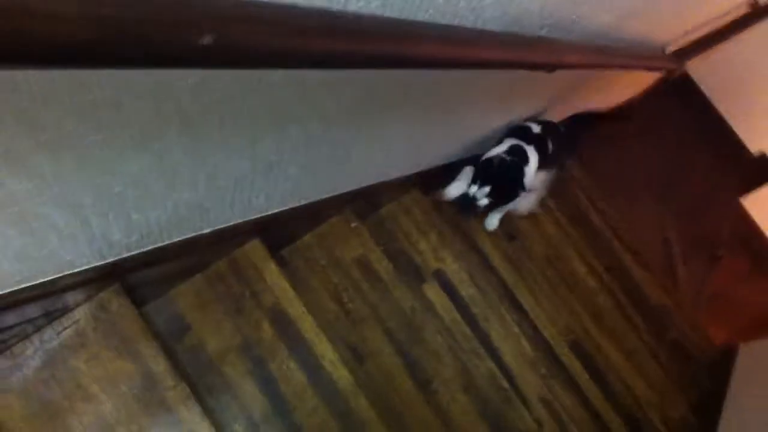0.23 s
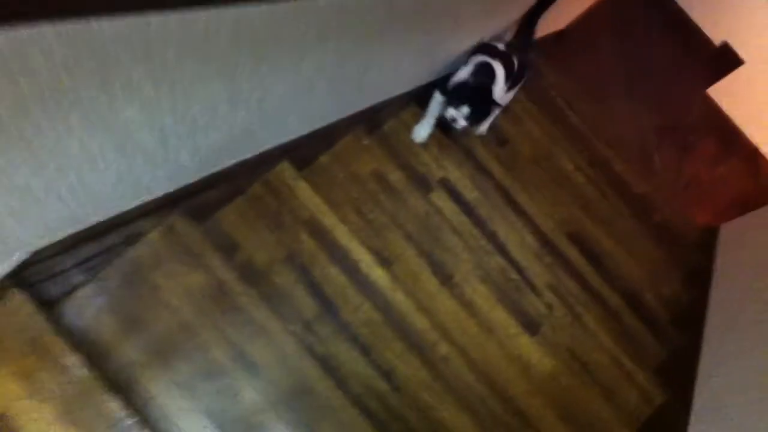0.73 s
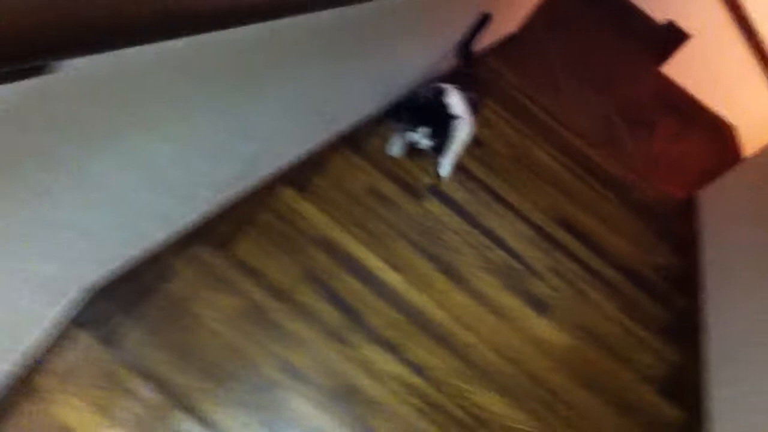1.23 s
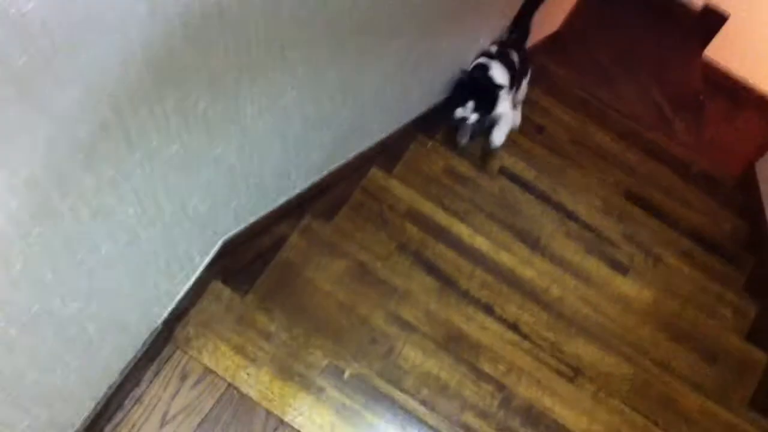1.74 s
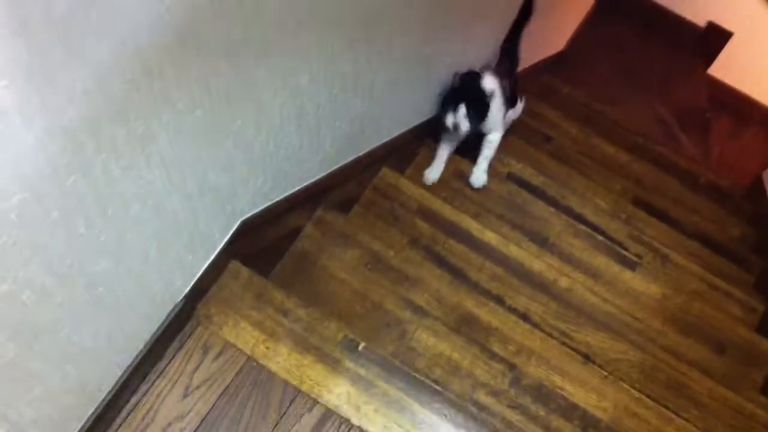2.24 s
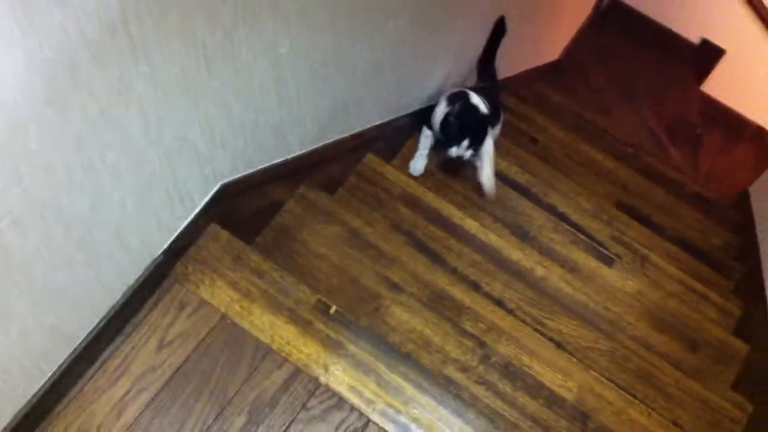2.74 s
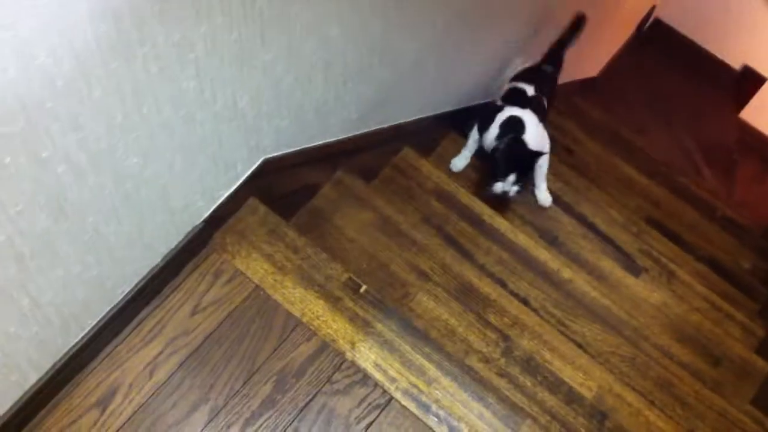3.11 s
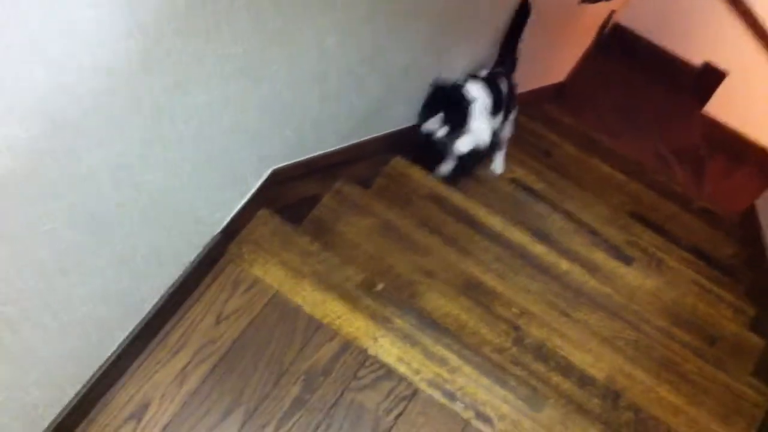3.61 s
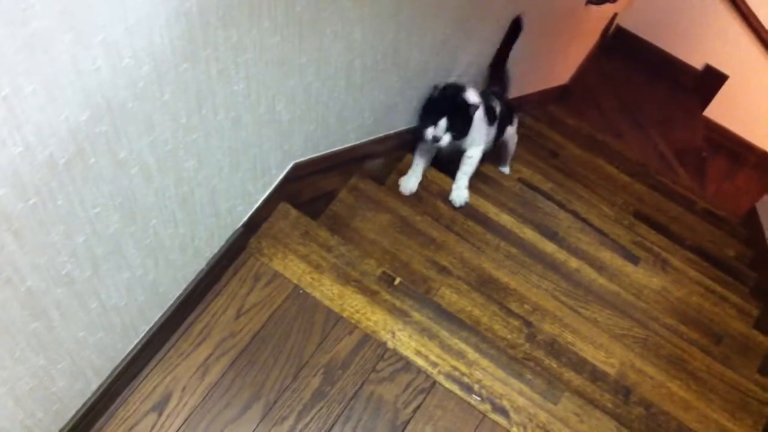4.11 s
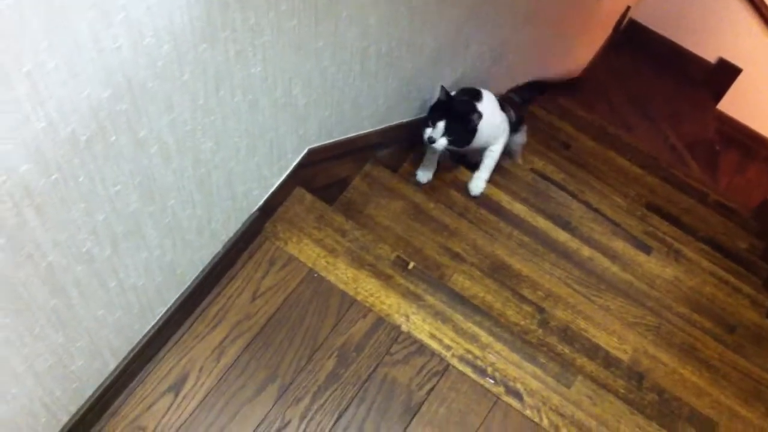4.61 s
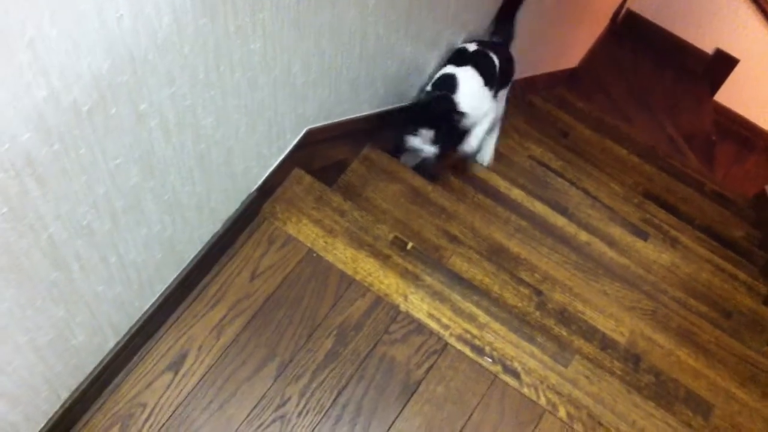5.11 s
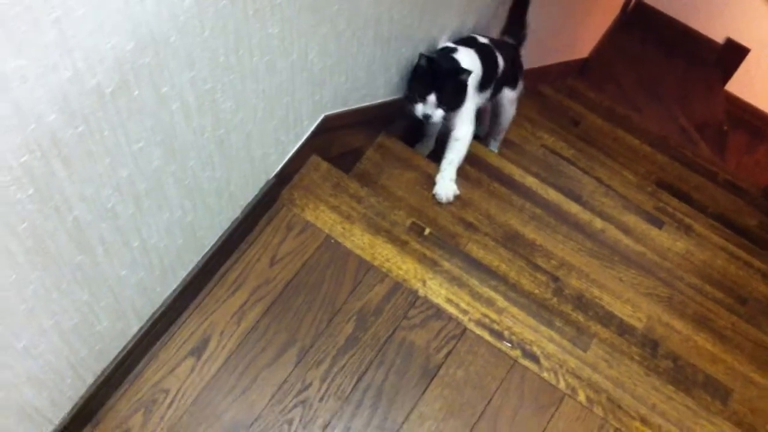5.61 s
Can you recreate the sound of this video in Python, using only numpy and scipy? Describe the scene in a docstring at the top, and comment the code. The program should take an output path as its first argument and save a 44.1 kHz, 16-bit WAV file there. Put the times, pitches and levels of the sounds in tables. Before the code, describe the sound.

Soft, irregular paw thumps and light claw taps sound on varnished wooden stairs as a cat makes its way up, heard from a nearby hand-held microphone. Brief dry rustles pass now and then. One sharp, much louder knock on the wood stands out around the middle, followed by more gentle steps and barely audible squeaks from a tread. The stairwell adds a short echo over a faint steady hiss.

```python
"""A quiet, echoing stairwell, with a hand-held mono microphone close to a cat on the wooden stairs.
Each paw thumps a tread into its low modes, with a knock, a tick and a scuff on top; one hard knock is
far louder. Claws tap the varnish, and late on a tread squeaks faintly under load. Cloth or fur brushes
past now and then, close and dry, over the steady hiss of house and microphone."""
import sys
import numpy as np
from scipy import signal
from scipy.fft import rfft, irfft
from scipy.io import wavfile
from scipy.ndimage import uniform_filter1d

SR = 44100
rng = np.random.default_rng(int(sys.argv[2]) if len(sys.argv) > 2 else 0)


def wrap_up_sound(samples):
    """Save the sound to the file named by the first command line argument, as 16-bit audio."""
    columns = np.atleast_2d(samples).T
    # keep every value between -1 and 1, then stretch to whole-number steps
    tamed = np.clip(columns, -1, 1)
    steps = np.round(tamed * 32767).astype(np.int16)
    wavfile.write(sys.argv[1], SR, steps)


N = 258412

# Spectrum of the house and microphone hiss: f/Hz, relative density/dB
HISS_SPECTRUM = [(15, -60), (25, -13), (49, -20), (165, 4), (458, -6.5), (568, -3), (667, -8), (1860, -11),
                 (2010, -13), (2560, -14.5), (3540, -15), (4760, -17.5), (15600, -20)]
# Strokes of cloth or fur: crest t/s, rise/s, hold/s, fall/s, bright level/dB, dull part re bright/dB
BRUSH_STROKES = [(0.142, 0.27, 0.014, 0.14, -67, 5), (0.21, 0.023, 0.01, 0.35, -68.5, 4),
                 (0.647, 0.32, 0.092, 0.068, -52.5, -9), (0.786, 0.078, 0.23, 0.12, -69, -1),
                 (1.148, 0.2, 0.18, 0.1, -60, -1.5), (1.389, 0.08, 0.13, 0.17, -60, 0),
                 (1.65, 0.25, 0.021, 0.12, -49, -3), (1.737, 0.1, 0.08, 0.38, -53, -4),
                 (2.136, 0.05, 0.0092, 0.17, -64, -3.5), (2.347, 0.048, 0.019, 0.19, -69, 8.5),
                 (3.054, 0.076, 0.097, 0.13, -60, 0.5), (3.298, 0.025, 0.1, 0.027, -50.5, -9),
                 (3.55, 0.4, 0.055, 0.21, -63, -0.5), (3.976, 0.15, 0.01, 0.25, -68.5, -3),
                 (4.181, 0.041, 0.13, 0.15, -73, 4.5), (4.398, 0.092, 0.01, 0.13, -68.5, -4)]
# Bright and dull bands of the brushing: f/Hz, width/Hz, relative level/dB
BRIGHT_BANDS = [(5250, 2940, 1), (8360, 3800, 0), (11630, 3000, 2.5), (14700, 3500, 0.5)]
DULL_BANDS = [(450, 1070, 4), (1030, 2700, -53), (2050, 1530, 1.5), (3130, 2500, -2)]
# Paw falls: t/s, thump level/dB, thump centre f/Hz, then re the thump: upper modes/dB, knock/dB,
# tick/dB, scuff/dB; then ring t60/s, paw softness/ms
PAW_STEPS = [(0.004, -40, 177, -13.5, -27, -40, -33, 0.18, 1.6),
             (0.079, -46.5, 264, -7, -11, -13, -20, 0.19, 5.7),
             (0.202, -44.5, 313, -17, -13, -16, -16, 0.26, 1.05),
             (0.249, -52, 201, -19, -33, -16, -26, 0.16, 2.2),
             (0.43, -43, 218, -1, -9.5, -11, -15.5, 0.28, 2.6),
             (0.576, -54, 229, 2, -14, -5, -15, 0.17, 4.1), (0.738, -56, 235, -7, -9, -2, -2, 0.22, 5.9),
             (0.838, -32.5, 194, -6, -17, -39, -23, 0.1, 12.6),
             (0.889, -37.5, 239, -10, -23, -37, -37, 0.074, 2.7),
             (0.966, -50, 129, -21, -20, -27, -27, 0.17, 6.2),
             (1.242, -44.5, 158, 0.5, -11, -3.5, -11.5, 0.12, 2.7),
             (1.313, -33, 211, -24, -24, -27.5, -38, 0.37, 2.3),
             (1.38, -38.5, 237, -13, -28, -23, -35, 0.11, 4.1),
             (1.667, -39, 136, -2.5, -20, -27, -16, 0.14, 3.6),
             (1.749, -48.5, 221, -12, -27, -4, 3, 0.15, 4.8),
             (1.974, -37.5, 203, 0.5, -10.5, -29, -24, 0.24, 6.3),
             (2.158, -35.5, 225, -11, -19.5, -27, -25.5, 0.099, 3),
             (2.199, -42, 275, -22, -36, -31, -21, 0.07, 2.5),
             (2.338, -44.5, 137, -7, -12.5, -7.5, -25, 0.23, 4),
             (2.582, -50.5, 266, -24, -18, -11, -25, 0.19, 7.4),
             (2.663, -43, 157, -8.5, -17, -22, -30, 0.2, 7.3),
             (2.78, -55, 182, -1, -34, -10, -23, 0.12, 5.5), (2.929, -50, 232, -8, -26, -24, -20, 0.067, 3),
             (3.018, -43, 172, -11, -29, -25, -21, 0.11, 2.7),
             (3.069, -51, 240, -30, -29, -24, -5, 0.17, 2.8),
             (3.165, -43, 151, -23, -36, -31, -18, 0.11, 3),
             (3.416, -16.5, 303, 3.5, -22.5, -12, -19.5, 0.16, 1.2),
             (3.868, -46, 156, -5, -18.5, -23, -23, 0.18, 2.5),
             (4.175, -38, 165, -10, -12, -10, -19, 0.36, 6.4),
             (4.249, -45, 185, -13, -16, -11, -27, 0.21, 11),
             (4.38, -55.5, 170, 12, -24, -13.5, -12, 0.078, 4.3),
             (4.509, -53, 159, -14, -15, -21, -15, 0.13, 4.7),
             (4.771, -40.5, 146, -17, -45, -35, -30, 0.19, 5.4),
             (4.849, -61, 180, -16, -31, -24, -22, 0.24, 5),
             (5.155, -44.5, 183, -36, -35, -32, -34, 0.21, 8.8),
             (5.262, -43.5, 188, 4, -14.5, -32, -32, 0.087, 12.7),
             (5.349, -63, 182, -19, -10, -9, -21, 0.18, 2.8),
             (5.553, -46.5, 172, -4, -18, -37, -35, 0.26, 12),
             (5.665, -35.5, 180, -6, -19.5, -29, -23.5, 0.14, 13),
             (5.75, -55, 194, -26, -18, -15, -23, 0.098, 2.8)]
# Modes of the treads and the hollow below them: f/Hz, relative level/dB, factor on the step's t60
TREAD_MODES = [(88, -28, 0.2), (120.4, -0.5, 0.53), (144.8, 3, 0.8), (160.7, -4.5, 1.3), (187.7, 0, 0.71),
               (220.2, 1.5, 0.74), (260.2, -3, 1.02), (311.5, 5, 0.6), (365.8, 8, 0.32), (415.2, 0, 0.61),
               (485.5, -6, 1.48), (519.7, 0, 0.76), (582, -14.5, 2.06), (624, -3, 0.64)]
# Noise bands of a paw's knock, tick and scuff: f/Hz, width/Hz, relative level/dB
KNOCK_BANDS = [(714, 315, -7), (980, 580, -9.5)]
TICK_BANDS = [(1435, 86, 12.5), (1870, 510, 8)]
SCUFF_BANDS = [(2900, 1850, 4), (4340, 1900, -1.5), (5840, 1500, -11.5), (9900, 8100, -27)]
# Thin high modes of the boards, rung by the claws: f/Hz, relative level/dB, t60/s
BOARD_MODES = [(1288, 0.5, 0.068), (1435, -6, 0.25), (1700, -2, 0.15), (1750, -4, 0.083), (1820, 0, 0.094),
               (2010, -12, 0.2), (2230, -6, 0.15), (2976, -6.5, 0.2)]
# Decay and colour of the stairwell's echo: f/Hz, t60/s, relative level/dB
ECHO_BANDS = [(106, 0.41, -11.5), (206, 0.33, 4), (506, 0.51, -2.5), (1200, 0.58, -1.5), (2840, 0.52, 1.5),
              (8000, 0.28, -0.5)]
# Bare claws tapping the varnish: t/s, level/dB, f/Hz
CLAW_TAPS = [(0.203, -35, 1330), (0.429, -46, 940), (1.246, -40.5, 1940), (2.161, -38, 1060),
             (2.337, -52, 1980), (2.663, -44, 730), (3.282, -43.5, 1540), (3.415, -21, 1820),
             (3.416, -38, 5450), (4.177, -47.5, 770), (4.18, -42, 1820), (5.553, -49.5, 770),
             (5.665, -47, 745)]
# Squeaks of a loaded tread: t/s, f/Hz, level/dB, length/s
TREAD_SQUEAKS = [(4.464, 1660, -74.5, 0.21), (4.549, 2040, -75.5, 0.22), (4.548, 3560, -75, 0.19),
                 (5.338, 1530, -68, 0.058), (5.38, 1710, -72, 0.051), (5.701, 1530, -68, 0.057),
                 (5.728, 1700, -70, 0.067)]

HISS_DB, ECHO_DB, BOARDS_RE_TICK_DB = -65.5, -4.5, -27
BRUSH_EDGE_DB, BRUSH_SAG_DB = -23.5, -2.5  # where a stroke starts and ends; loss during the hold
KNOCK_T60_S, TICK_T60_S, CLAW_T60_S = 0.21, 0.066, 0.0066
THUMP_SPREAD_OCT, THUMP_SCATTER_DB = 0.42, 1.5
# Harder blows reach further into the lowest and highest modes, per dB above a light step.
LIGHT_STEP_DB = -45
LOWER_TO_HZ, LOWER_DB, LOWER_GAIN_PER_DB = 125, -14.5, 0.42
UPPER_FROM_HZ, UPPER_HZ, UPPER_SPREAD_OCT, UPPER_RISE_OCT_PER_DB = 330, 365, 0.33, 0.014
STEP_LOW_CUT_HZ, HIGH_CUT_HZ = 110, 15680


def undb(db):
    """Decibels to gain."""
    return 10 ** (np.asarray(db) / 20)


def unit(x):
    """Scale to rms 1."""
    return x / np.sqrt(np.mean(x ** 2))


def fade(t, t60):
    """Exponential decay, 60 dB down after t60 seconds."""
    return np.exp(-np.log(1000) * t / t60)


def shaped_noise(size, gain):
    """Noise of rms 1 whose spectrum follows gain(Hz)."""
    hz = np.maximum(np.fft.rfftfreq(size, 1 / SR), 1)
    return unit(irfft(rfft(rng.standard_normal(size)) * gain(hz), size))


def band_noise(size, bands):
    """Noise of rms 1 through resonances given as f/Hz, width/Hz, level/dB."""
    def gain(hz):
        powers = (undb(db) ** 2 / (1 + ((hz - f * f / hz) / width) ** 4) for f, width, db in bands)
        return np.sqrt(sum(powers))
    return shaped_noise(size, gain)


def add(out, start, sound):
    """Mix a sound in at start seconds."""
    i = int(max(start, 0) * SR)
    out[i:i + len(sound)] += sound[:len(out) - i]


def flicker(rate):
    """Random wobble of rms 1, about rate changes a second."""
    hold = int(SR / rate)
    held = np.repeat(rng.standard_normal(N // hold + 1), hold)
    return unit(uniform_filter1d(held, hold)[:N])


def hiss():
    """Steady noise floor of the house and the microphone, wavering very slightly."""
    hz, db = np.transpose(HISS_SPECTRUM)
    level = undb(HISS_DB + 0.26 * flicker(1.95))
    return level * shaped_noise(N, lambda f: undb(np.interp(np.log(f), np.log(hz), db)))


def brushing():
    """Fibres slide close to the microphone: strokes of grainy hiss with a bright and a dull part."""
    t, out = np.arange(N) / SR, np.zeros(N)
    bright = band_noise(N, BRIGHT_BANDS) * undb(0.69 * flicker(150) + 1.1 * flicker(12))
    dull = band_noise(N, DULL_BANDS) * undb(0.83 * flicker(100) + 0.25 * flicker(50))
    corner_db = [BRUSH_EDGE_DB, 0, BRUSH_SAG_DB, BRUSH_EDGE_DB]
    for crest, rise, hold, fall, db, dull_db in BRUSH_STROKES:
        corners = [crest - rise, crest, crest + hold, crest + hold + fall]
        shape_db = np.interp(t, corners, corner_db, left=-np.inf, right=-np.inf)
        out += undb(db + shape_db) * (bright + undb(dull_db) * dull)
    return out


def tread_ring(t, db, centre_hz, upper_db, t60, chance):
    """A struck tread rings in the modes near centre_hz; a hard blow reaches lower and higher ones."""
    hz, mode_db, t60_factor = np.transpose(TREAD_MODES)[:, :, None]
    scatter, detune, phase = chance
    force_db = max(db - LIGHT_STEP_DB, 0)
    near = np.exp(-.5 * (np.log2(hz / centre_hz) / THUMP_SPREAD_OCT) ** 2)
    lower = (hz < LOWER_TO_HZ) * undb(LOWER_DB + LOWER_GAIN_PER_DB * force_db)
    away_oct = np.log2(hz / UPPER_HZ) - UPPER_RISE_OCT_PER_DB * force_db
    upper = (hz > UPPER_FROM_HZ) * np.exp(-.5 * (away_oct / UPPER_SPREAD_OCT) ** 2)
    gain = (near + lower + upper * undb(upper_db)) * undb(mode_db + THUMP_SCATTER_DB * scatter)
    cycles = hz * (1 + 0.0097 * detune) * t + 0.13 * phase
    return np.sum(gain * np.sin(2 * np.pi * cycles) * fade(t, t60 * t60_factor), axis=0)


def board_ring(t, chance):
    """Claws ring the boards' thin high modes; one random number a mode shifts its level and phase."""
    hz, db, t60 = np.transpose(BOARD_MODES)[:, :, None]
    modes = undb(db + 2 * chance) * np.sin(2 * np.pi * (hz * t + chance)) * fade(t, t60)
    return undb(BOARDS_RE_TICK_DB) * modes.sum(axis=0)


def paws(echo):
    """Each paw thumps a tread, with short noise bursts for its knock, tick and scuff."""
    out, t = np.zeros(N), np.arange(SR // 2) / SR
    noises = np.array([band_noise(N, bands) for bands in (KNOCK_BANDS, TICK_BANDS, SCUFF_BANDS)])
    chances = rng.standard_normal((len(PAW_STEPS), 3, len(TREAD_MODES), 1))
    for row, chance in zip(PAW_STEPS, chances):
        start, db, centre_hz, upper_db, knock_db, tick_db, scuff_db, t60, soft_ms = row
        press = 1 - np.exp(-t / (soft_ms / 1000))  # a padded paw loads the wood gradually
        thump = press ** 2 * tread_ring(t, db, centre_hz, upper_db, t60, chance)
        thump /= np.abs(thump).max()
        span = np.arange(len(t)) + int(start * SR)
        knock_noise, tick_noise, scuff_noise = np.take(noises, span, axis=1, mode="wrap")
        knock = knock_noise * fade(t, KNOCK_T60_S) * np.sqrt(press)
        scratch_envelope = fade(t, TICK_T60_S) * np.sqrt(press)
        tick = tick_noise * scratch_envelope + board_ring(t, chance[2, :len(BOARD_MODES)])
        scuff = scuff_noise * scratch_envelope
        step = thump + undb(knock_db) * knock + undb(tick_db) * tick + undb(scuff_db) * scuff
        add(out, start, echo(undb(db) * step, start))
    return out


def stairwell():
    """Diffuse echo: half-octave noise bands, each dying at its own rate; every spot has its own pattern."""
    t = np.arange(SR * 3 // 4) / SR
    centres = 70 * 2 ** np.arange(0, 7.6, .5)
    hz, t60, db = np.transpose(ECHO_BANDS)
    colour = undb(np.interp(np.log(centres), np.log(hz), db)) * np.sqrt(centres)
    bands = np.array([band_noise(N + SR, [(f, f / 3, 0)]) for f in centres]) * colour[:, None]
    band_t60 = np.interp(np.log(centres), np.log(hz), t60)
    build_up = 1 - np.exp(-t / 0.0033)  # reflections gather after the direct sound
    decays = fade(t, band_t60[:, None]) * build_up

    def echo(direct, start):
        """The direct sound and its tail, for a strike at start seconds."""
        tail = np.sum(bands[:, int(start * SR):][:, :len(t)] * decays, axis=0)
        heard = undb(ECHO_DB) * signal.fftconvolve(direct, tail / np.sqrt(np.sum(tail ** 2)))
        add(heard, 0, direct)
        return heard
    return echo


def claws(echo):
    """A claw on varnish rings a few cycles of one stiff, quickly damped mode."""
    out, t = np.zeros(N), np.arange(SR // 20) / SR
    for start, db, hz in CLAW_TAPS:
        tap = undb(db) * np.sin(2 * np.pi * hz * t) * fade(t, CLAW_T60_S)
        add(out, start, echo(tap, start))
    return out


def squeaks():
    """A tread under load gives faint, breathy squeaks: narrow bands of noise that swell and fade."""
    out = np.zeros(N)
    for start, hz, db, length in TREAD_SQUEAKS:
        size = int(length * SR)
        breath = band_noise(SR, [(hz, 230, 0)])[:size]
        add(out, start, undb(db) * breath * np.sqrt(np.hanning(size)))
    return out


def scene():
    """At the microphone: paws and claws echo and lose their low bass; the rest is close and dry."""
    echo = stairwell()
    low_cut = signal.butter(3, STEP_LOW_CUT_HZ, "high", fs=SR, output="sos")
    steps = signal.sosfilt(low_cut, paws(echo) + claws(echo))
    return np.tile(steps + squeaks() + brushing() + hiss(), (2, 1))


def record(dry):
    """One hand-held microphone on both channels, with the top cut off steeply."""
    high_cut = signal.ellip(10, .2, 60, HIGH_CUT_HZ, fs=SR, output="sos")
    return signal.sosfilt(high_cut, dry)


dry = scene()
out = record(dry)
wrap_up_sound(out)
```